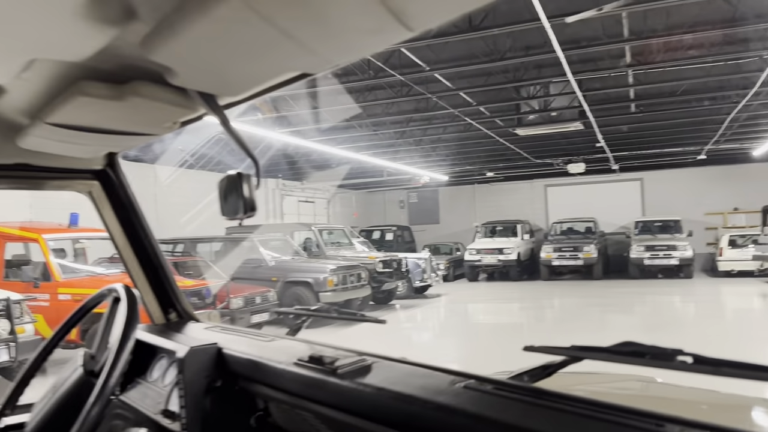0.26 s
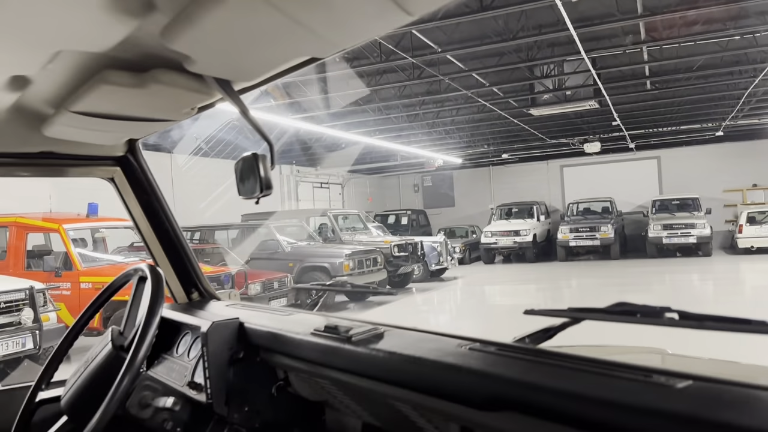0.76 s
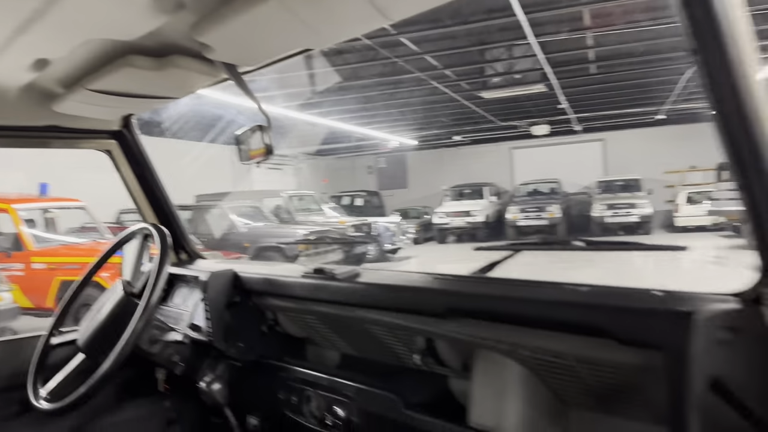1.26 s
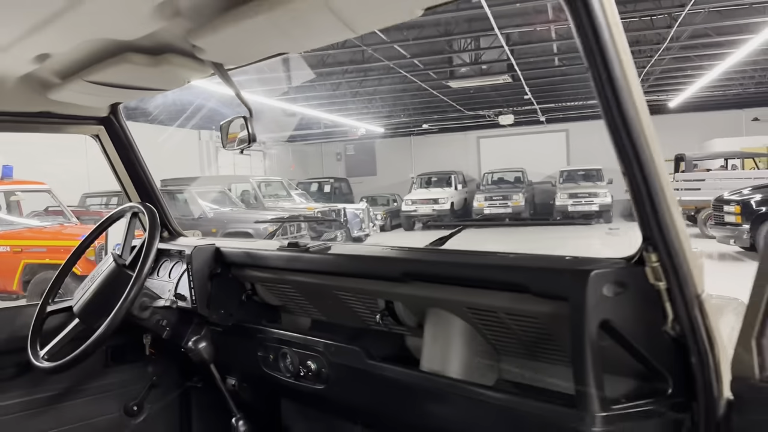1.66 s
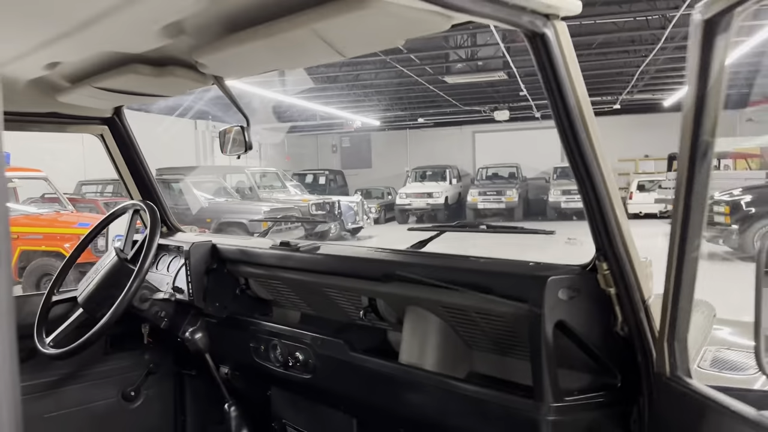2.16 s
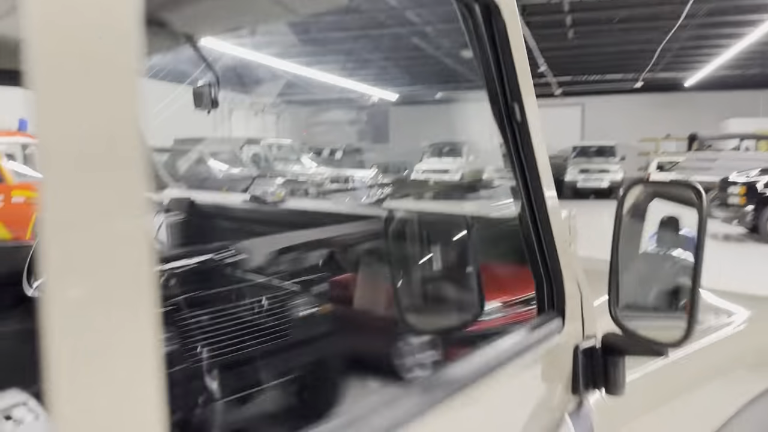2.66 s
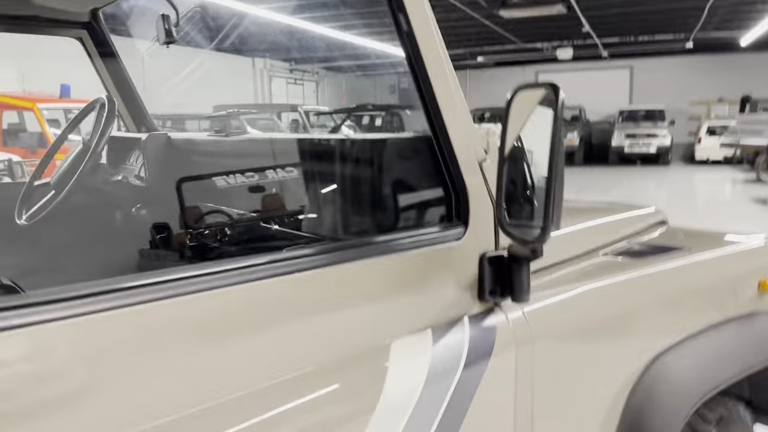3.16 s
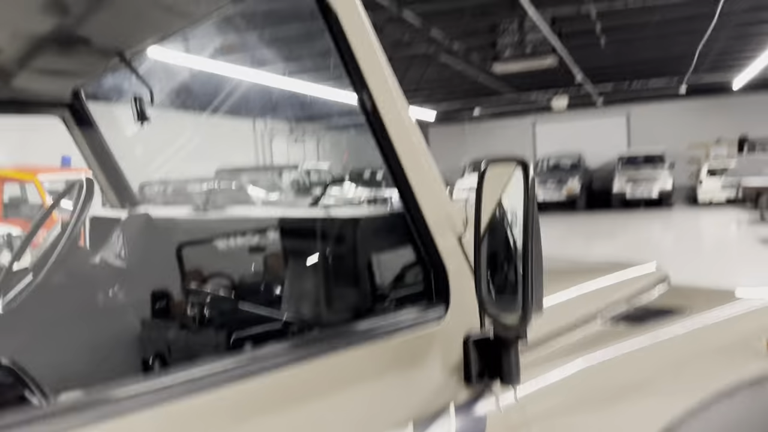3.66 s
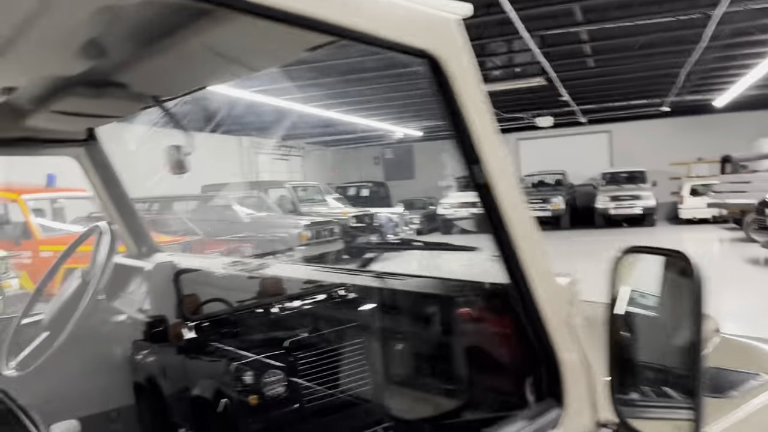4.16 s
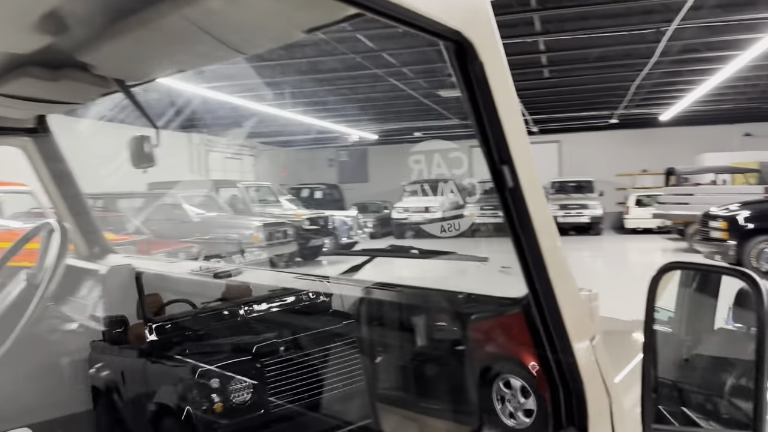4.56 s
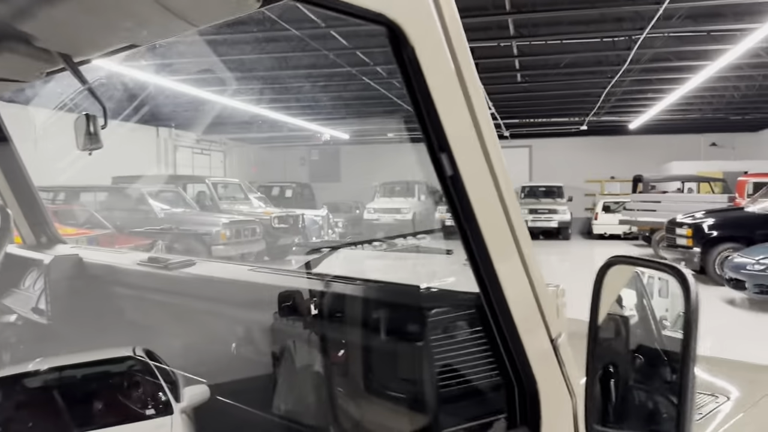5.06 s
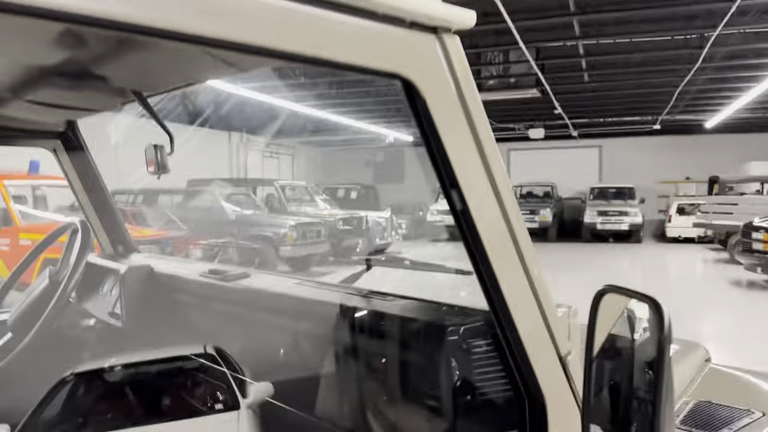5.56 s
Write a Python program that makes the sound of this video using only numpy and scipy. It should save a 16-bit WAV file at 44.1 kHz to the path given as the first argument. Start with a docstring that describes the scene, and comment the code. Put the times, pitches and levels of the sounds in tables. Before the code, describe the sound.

In a big echoing showroom, cloth and shoes rub, a floor thuds, door hardware clicks and ratchets, then a heavy steel vehicle door slams.

```python
"""In a large showroom someone climbs out of an off-road car and then slams its steel door.
Clothes and soles rub as shaped noise, the floor pan thuds as sinking modes, the door hardware clicks,
and the stay chatters by stick-slip. In the slam the latch catches, the panels ring, the cabin booms
and loose parts rattle, as short noise bursts and damped modes. The hall answers with decaying noise
tails, over a low ventilation rumble, a mains hum and a hiss of air."""
import sys
import numpy as np
from scipy import signal
from scipy.fft import rfft, irfft, next_fast_len
from scipy.io import wavfile
from scipy.ndimage import map_coordinates

SR = 44100
rng = np.random.default_rng(int(sys.argv[2]) if len(sys.argv) > 2 else 0)


def inscribe(sig):
    """Save sig as 16-bit PCM at rate SR to the path in sys.argv[1].

    A 1-D sig is mono; a 2-D sig holds one channel per row.
    Samples are clipped to [-1, 1] before scaling.
    """
    pcm = np.round(np.clip(np.atleast_2d(sig).T, -1, 1) * 32767)
    wavfile.write(sys.argv[1], SR, pcm.astype(np.int16))


N = 255780  # samples

# Edges of the five registers thump, body, clank, crack, sizzle: edge_hz
REGISTER_EDGES = [130, 330, 900, 2300, 7000, 16000]
# Register balance of each kind of contact: thump_db, body_db, clank_db, crack_db, sizzle_db
SLAM_TONE = [-6, 4, 3, 2, -8]
TAP_TONE = [-3.5, -1, 4, 3.5, -2.5]
SLIP_TONE = [-10, -10.5, -2.5, -18.5, -31]
SCUFF_TONE = [-1, 2, 0.5, -13, -27]
SWISH_TONE = [-1.5, -12, -8, -2.5, -5]

# Contacts of the closing door; t60_s is that of the clank register and of the struck part:
# start_s, level_db, tilt_db (per register), t60_s, part_pitch_hz, part_level_db
SLAM_CONTACTS = [(4.799, -31, -0.5, 0.073, 2900, -29), (4.806, -28.5, -9.5, .05, 2000, -27.5),
                 (4.8155, -15, 4.5, 0.025, 5020, -17.5), (4.8195, -21.5, 4.5, 0.019, 4050, -30.5),
                 (4.8226, -31, -11.5, 0.022, 780, -27.5), (4.83, -28, 2, 0.11, 6200, -27.5),
                 (4.851, -18.5, 1.5, 0.035, 6500, -20.5), (4.8573, -13, -1, 0.022, 1300, -15),
                 (4.8585, -28, 0, 0.025, 5600, -24.5), (4.877, -34, 3, .06, 10200, -41),
                 (4.883, -37.5, 5.5, .04, 10480, -45.5), (4.899, -34.5, -5.5, .05, 420, -28.5),
                 (4.914, -36, 0.5, .06, 3670, -34.5), (4.934, -44, -9, .05, 1500, -40),
                 (4.969, -29.5, -2.5, 0.034, 7040, -37.5), (4.9725, -34.5, -3.5, 0.037, 3640, -35),
                 (5.2186, -43, 1, .06, 1233, -38.5), (5.229, -49, -4, .05, 2700, -47)]
# Build-up of a door contact in each register, the bass slowest: rise_s
SLAM_RISE = [.016, 0.0029, 0.0012, .0005, .0004]
# Resonances of the door shell: centre_hz, width_hz, level_db
DOOR_SHELL = [(226, 120, 7), (360, 75, -8.5), (479, 140, -12.5), (806, 430, -12), (1240, 290, -14),
              (1300, 200, -7.5), (1633, 210, -5.5), (2010, 380, -10), (2770, 530, -9), (3980, 1500, -14),
              (5250, 390, -12.5), (6760, 3100, -22.5), (9900, 2700, -18.5), (13800, 4000, -28)]
# Cabin air, shoved by the seal: pitch_hz, relative_db, t60_s
CABIN_MODES = [(47, -9.5, 0.33), (57.4, -7.5, 0.37), (77.6, -6.5, 0.32), (130.7, -13.5, 0.22)]
# Broad door skin: pitch_hz, relative_db, t60_s
SKIN_MODES = [(198, -26, 0.39), (229.2, -8.5, 0.13), (256.8, -12.5, 0.38), (316, -19.5, 0.079),
              (370, -21, 0.17), (385.4, -20, .18), (431, -24, 0.09), (464, -27, 0.22), (626, -33, 0.17)]
# Stiff door frame and its glass: pitch_hz, relative_db, t60_s
FRAME_MODES = [(722, -34, .3), (777, -32, .25), (804, -29, .2), (915, -34, .2), (948, -29, .22),
               (1140, -29, .18), (1222, -30, .2), (1315, -30, .19), (1600, -35, .2), (1660, -31, .2),
               (1820, -40, .18), (2090, -33, .11), (2175, -42, .14), (2660, -39, .11)]
# Steel latch: pitch_hz, relative_db, t60_s
LATCH_MODES = [(2770, -23, .022), (3370, -35, .07), (4050, -21, .028), (5450, -27, 0.04), (5610, -34, 0.07),
               (6090, -29, .06)]
# Low standing waves that hang on after the slam: pitch_hz, level_db, t60_s
STANDING_WAVES = [(43.1, -21, 2.17), (45, -25.5, 1.5), (75.5, -23, 1.5), (83.5, -26, 2.4),
                  (121.7, -23.5, 0.97), (171.8, -24, 1.2)]
# Left-right likeness of door sounds: freq_hz, correlation (0-1)
DOOR_LIKENESS = [(100, 0.7), (400, 0.7), (1000, 0.3), (4000, 0.2), (10000, .95)]
# Phase lead of the left side in the slam: freq_hz, lead_rad
DOOR_PHASE_LEAD = [(100, 0.36), (500, -0.9), (1300, 1.5), (2900, -1.6), (5600, 1.5), (8100, 1.5),
                   (11000, 0.6), (15000, 1)]
# Lean of the slam to the left: freq_hz, left_over_right_db
DOOR_LEAN = [(60, 1.5), (110, 2), (200, 4), (380, 5.5), (700, 3.5), (1300, -1), (2400, 0.5), (4400, 2.5),
             (8100, 1.5), (15000, 0)]

# Clicks of the handle and lock:
# start_s, level_db, tilt_db (per register), rise_s, t60_s, part_pitch_hz, part_level_db
CLICKS = [(0.8738, -43.5, -0.5, 0.001, .11, 870, -39), (1.261, -65, -4, 0.0018, .04, 950, -56),
          (1.278, -65, -6, 0.0017, 0.039, 3000, -55), (1.307, -83, 1, .002, .04, 1640, -51.5),
          (1.324, -58, -4.5, .0017, 0.034, 850, -55), (1.347, -62, -3, .0016, 0.026, 3700, -52.5),
          (1.383, -74, -1, .002, .04, 1500, -54), (1.473, -62, -5, 0.0018, .09, 457, -50),
          (1.493, -57.5, -0.5, 0.0033, 0.24, 4540, -56.5), (1.511, -56.5, -1, 0.0022, 0.069, 696, -44),
          (1.517, -58, -0.5, .001, .05, 5700, -49), (1.742, -44, 2.5, 0.0124, .18, 4530, -49),
          (1.759, -64.5, 10.5, .001, .04, 2360, -39), (1.77, -52, 5, 0.0012, 0.034, 1490, -46),
          (2.0921, -37, 2.5, 0.0047, .15, 305, -35.5), (2.325, -60.5, -6, 0.0042, 0.086, 1300, -62),
          (5.18, -50.5, -7.5, 0.00094, .02, 3400, -48)]
# Resonances of the small hardware: centre_hz, width_hz, level_db
HARDWARE_BODY = [(260, 250, 3), (478, 800, 4.5), (840, 900, -6), (1110, 120, 4.5), (1320, 700, 6.5),
                 (2100, 410, -11.5), (2730, 860, -13), (3630, 640, -14.5), (4350, 1000, -11),
                 (5860, 2000, -20.5), (7160, 700, -22), (9680, 2300, -19), (13400, 4000, -27.5)]
# Spring catch: pitch_hz, level_db, t60_s
CATCH_MODES = [(490, -31, .095), (810, -31, .06), (980, -45, .16), (1770, -43, .09), (2035, -43, .065),
               (2676, -45, .11), (3214, -41, .075), (3790, -41, .08), (3935, -46, .1), (4258, -49, .12),
               (4500, -41, .07)]
# Door handle: pitch_hz, level_db, t60_s
HANDLE_MODES = [(1287, -29, .11), (2050, -40, .08), (2503, -36, .1), (3661, -38, .12), (4630, -36, .075),
                (4872, -47, .1), (5410, -47, .12), (6105, -43, .1), (7138, -47, .09), (7488, -48, .11)]
# Lock mechanism: pitch_hz, level_db, t60_s
LOCK_MODES = [(275, -34, .15), (354, -35, .17), (856, -31, .1), (1150, -38, .12), (1254, -40, .21),
              (1964, -39, .1), (2890, -38, .12), (3273, -41, .14), (4370, -37, .09), (4791, -41, .14),
              (5405, -47, .13), (7400, -43, .1), (7585, -42, .11)]
# Slips of the stay as the door swings: start_s, level_db
STAY_SLIPS = [(1.7978, -32.5), (1.82, -34.5), (1.845, -35), (1.8902, -36), (1.901, -43.5), (2.0472, -34.5),
              (2.067, -36.5), (2.079, -38.5), (4.351, -46.5), (4.376, -58), (4.3975, -47.5), (4.424, -47.5)]
# Steel stay of the door: pitch_hz, relative_db, t60_s
STAY_MODES = [(863, -17, .1), (1063, -8.5, .1), (1150, -13, .08), (1295, -6, .08), (1343, -7.5, .1),
              (1456, -11, .07), (1487, -9, .07), (1965, -12, .07), (2350, -18, .05)]
# Lean of the small hardware to the left: freq_hz, left_over_right_db
HARDWARE_LEAN = [(200, 4.0), (400, -1.5), (2400, 0.5), (4400, 3.5), (15000, 0.0)]
# Knocks on sheet metal: start_s, peak_db, softness_hz (low-pass), lowest_hz (high-pass)
KNOCKS = [(1.015, -47, 800, 200), (3.685, -38, 650, 150), (3.7014, -22.5, 633, 90),
          (3.7104, -41, 5000, 600), (4.351, -38, 900, 200), (4.426, -39.5, 703, 150),
          (4.646, -42.5, 753, 150), (4.723, -34.5, 700, 199), (4.8202, -11.5, 239.6, 60),
          (4.8255, -12.5, 190.6, 60), (4.858, -16, 1100, 200)]
# Loose trim panel: pitch_hz, relative_db, t60_s
TRIM_MODES = [(58, -26, .12), (135, -27.5, 0.029), (320, -36, .025), (460, -41, .03), (1180, -31.5, 0.013),
              (2170, -40, 0.012)]
# Creaks of the pushed hinge: start_s, level_db
HINGE_CREAKS = [(4.647, -52.5), (4.656, -46.5), (4.6635, -47), (4.669, -45.5), (4.6745, -47), (4.7335, -54),
                (4.787, -59)]
# Resonances of the creaking hinge: centre_hz, width_hz, level_db
HINGE_BODY = [(6400, 880, -2.5), (10100, 1800, -4.5), (14000, 3000, -15)]
# Faint singing of the hinge as the door swings out: start_s, end_s, pitch_hz, level_db
HINGE_SQUEALS = [(1.29, 1.54, 2120, -73), (1.53, 1.67, 3000, -75)]

# Soles sliding: start_s, end_s, level_db, tilt_db (per register)
SOLE_SCUFFS = [(.211, .355, -47.5, 0.5), (.427, .452, -56.5, -7), (.455, .51, -69.5, -8.5),
               (.62, .66, -64, -9.5), (.772, .83, -56.5, 3), (1.258, 1.403, -67, 7.5),
               (1.465, 1.52, -67, -9.5), (3.379, 3.422, -54.5, 4.5), (4.355, 4.44, -61, -2),
               (4.656, 4.684, -47, -3), (4.684, 4.705, -55.5, -8), (3.53, 3.562, -70.5, -10.5),
               (4.70, 4.775, -61.5, -8.5), (4.777, 4.804, -49, -6.5)]
# Clothes brushing: start_s, end_s, level_db, tilt_db (per register)
CLOTH_SWISHES = [(0, .63, -60.5, -1.5), (.46, .615, -55, -3.5), (4.30, 4.435, -83.5, 9),
                 (4.395, 4.425, -67, 5.5), (4.66, 4.76, -76, 5), (5.17, 5.212, -69, 7.5),
                 (5.223, 5.29, -71, 0.5)]
# Resonances of the rubbed cab: centre_hz, width_hz, level_db
RUBBED_CAB = [(246, 48, 0), (493, 170, 10), (627, 170, 9), (1038, 310, -2.5), (1240, 170, -3.5),
              (1880, 800, -31.5), (2940, 4700, -17.5), (5650, 12000, -25.5), (9900, 2200, -16.5),
              (14000, 4000, -21)]
# Floor pan: pitch_hz (before it sinks), level_db, t60_s
FLOOR_MODES = [(110, -21, 0.46), (169.6, -24, 0.46), (197.6, -14.5, 0.17), (243, -21, 0.19),
               (303, -17.5, 0.097), (356.5, -29.5, 0.2)]
# Left-right likeness of nearby small sounds: freq_hz, correlation (0-1)
NEAR_LIKENESS = [(200, 0.87), (1000, 0.12), (4000, 0.21), (12000, 0.67)]

# Decay of the hall: freq_hz, t60_s
HALL_DECAY = [(50, 1.7), (120, 0.87), (300, 0.52), (1000, 0.93), (4000, 0.91), (12000, 0.19)]
# Relative strength of the hall: freq_hz, level_db
HALL_STRENGTH = [(45, -18.5), (100, -2.5), (250, -14.5), (520, -16.5), (1500, -22.5), (5000, -26.5),
                 (12000, -21)]
# Left-right likeness of hall and ventilation: freq_hz, correlation (0-1)
HALL_LIKENESS = [(60, 1), (150, 0.92), (380, 0.6), (950, 0.077), (2380, 0.053), (5980, 0.045),
                 (15000, 0.22)]
# Spectrum of the duct rumble: freq_hz, relative_db
RUMBLE_SPECTRUM = [(13, -63.5), (22, -37), (39, -12), (59, 0), (81, -5), (119, -2.5), (167, -5.5),
                   (241, -22.5), (316, -26.5), (380, -28), (416, -29), (500, -33.5), (650, -77.5),
                   (1100, -120)]
# Mean level of the duct rumble: time_s, level_db
RUMBLE_COURSE = [(0, -43.5), (.55, -42.5), (.75, -41), (5.8, -38.5)]
# Spectrum of the moving air: freq_hz, relative_db
AIR_SPECTRUM = [(240, -30), (400, -4), (442, -4.5), (477, -5), (613, -1.5), (1240, -5), (1510, -8),
                (2590, -18.5), (7150, -25), (8000, -31.5), (10400, -76.5), (17600, -120)]
# Lean of the rumble and hum, and of the air, to the left: freq_hz, left_over_right_db
RUMBLE_LEAN = [(60, 2.2), (200, 1.2), (380, 1.9)]
AIR_LEAN = [(400, 1.5), (700, 1.5), (2400, 0.85), (4400, 15.5), (8000, 24.9)]

SHIVER_DB, SHIVER_T60_S = -30, .19  # weak after-shake of the door shell
PART_WIDTH = 0.36  # bandwidth of a struck part's ring, as a share of its pitch
SPRING_HZ, SPRING_WIDTH_HZ, SPRING_DB, SPRING_T60_S = 3800, 2300, -38.5, 0.18
SLIP_RISE_S, SLIP_T60_S = .0008, .055
CHATTER_S, CHATTER_DB = .003, -8.5  # nominal delay and relative level of the stumble after a slip
TOP_HZ = 16100


def slam(low_life=1.5, crack_life=0.55, sizzle_life=0.63):
    """Repeated impact: latch and frame meet, the seal shoves the cabin air, hard stops excite modes."""
    out = np.zeros((2, N))
    t = np.arange(SR // 4) / SR
    lives = np.array([low_life, low_life, 1, crack_life, sizzle_life])[:, None, None]
    rise_s = np.array(SLAM_RISE)[:, None, None]
    for start_s, level_db, tilt_db, t60_s, part_hz, part_db in SLAM_CONTACTS:
        # a sharp crack, then the shell of the door shivers on
        crack = amp(-60 * t / (t60_s * lives))
        shiver = amp(SHIVER_DB - 60 * t / SHIVER_T60_S)
        fade = (crack + shiver) * (1 - np.exp(-t / rise_s))
        levels_db = voiced(SLAM_TONE, level_db, tilt_db)
        shell = dense(DOOR_SHELL, DOOR_LIKENESS, levels_db, len(t))
        add(out, start_s, np.sum(fade * shell, axis=0))
        add(out, start_s, clink(part_hz, part_db, t60_s))
    add(out, 4.8305, amp(-0.5) * ring(CABIN_MODES, cycles=0.43))
    # the two hard stops
    add(out, 4.819, ring(SKIN_MODES, cycles=0.94))
    add(out, 4.856, amp(-1.5) * ring(SKIN_MODES, cycles=0.22))
    add(out, 4.8175, amp(-1.0) * ring(FRAME_MODES, cycles=1.9))
    add(out, 4.858, amp(-0.5) * ring(FRAME_MODES, cycles=0.72))
    add(out, 4.816, ring(LATCH_MODES, cycles=2.6))
    add(out, 4.857, amp(-5.5) * ring(LATCH_MODES, cycles=3))
    halves = np.array([[1], [-1]])  # left leads by half, right lags by half
    out = filtered(out, lambda hz: np.exp(.5j * along(DOOR_PHASE_LEAD, hz) * halves))
    return leaning(out, DOOR_LEAN)


def boom():
    """Standing waves: deep modes swell after the slam and beat slowly as they die."""
    out = np.zeros((2, N))
    add(out, 4.84, ring(STANDING_WAVES, cycles=1.6))
    return panned(out, left_db=3.5)


def clink(hz, level_db, t60_s, rise_s=.0005):
    """Modal clustering: a struck part rings as a narrow band of close modes."""
    t = np.arange(SR // 4) / SR
    colour = lambda f: peak(f, hz, PART_WIDTH * hz)
    cluster = noise(colour, DOOR_LIKENESS, len(t))
    return amp(level_db - 60 * t / t60_s) * (1 - np.exp(-t / rise_s)) * cluster


def taps():
    """Impact and stick-slip: catch, handle and lock click and ring; the stay chatters in short slips."""
    out = np.zeros((2, N))
    for start_s, level_db, tilt_db, rise_s, t60_s, part_hz, part_db in CLICKS:
        add(out, start_s, clink(part_hz, part_db, t60_s))
        add(out, start_s, click(voiced(TAP_TONE, level_db, tilt_db), rise_s, t60_s))
    add(out, .8752, ring(CATCH_MODES, cycles=.8))
    add(out, .8752, spring())
    add(out, 1.752, ring(HANDLE_MODES, cycles=3.7, sag_s=0.0044, strain=0.1))
    add(out, 2.0955, ring(LOCK_MODES, cycles=2.6))
    for start_s, level_db in STAY_SLIPS:
        slip_db = np.add(SLIP_TONE, level_db)
        stumble_s = start_s + CHATTER_S * rng.uniform(.5, 2)
        add(out, start_s, click(slip_db, SLIP_RISE_S, SLIP_T60_S))
        add(out, stumble_s, click(slip_db + CHATTER_DB, SLIP_RISE_S, SLIP_T60_S))
        # the pitch drifts slightly, up or down
        add(out, start_s, amp(level_db) * ring(STAY_MODES, cycles=2.5, sag=rng.normal(0, .012)))
    return leaning(out, HARDWARE_LEAN)


def click(levels_db, rise_s, t60_s, snap=0.45, snap_s=0.00069):
    """Impulsive excitation: a small steel contact snaps, swells and dies."""
    t = np.arange(SR // 4) / SR
    swell = np.minimum(t / rise_s, 1)
    decay = amp(-60 * np.maximum(t - rise_s, 0) / t60_s)
    fade = swell * decay * (1 + snap * np.exp(-t / snap_s))
    return fade * dense(HARDWARE_BODY, NEAR_LIKENESS, levels_db, len(t)).sum(axis=0)


def spring():
    """High modal density: the spring behind the catch buzzes on in a band of close modes."""
    t = np.arange(SR // 4) / SR
    buzz = noise(lambda hz: peak(hz, SPRING_HZ, SPRING_WIDTH_HZ), NEAR_LIKENESS, len(t))
    return amp(SPRING_DB - 60 * t / SPRING_T60_S) * buzz


def knocks(travel_s=0.001997, slope=2.95):
    """Dispersion: bending waves run faster the higher they are, so a knock is a quick falling chirp."""
    out = np.zeros((2, N))
    hz = np.fft.rfftfreq(SR // 8, 1 / SR)
    cycles = 2 * travel_s * np.sqrt(1000 * hz)  # the delay is travel_s at 1 kHz
    for start_s, peak_db, soft_hz, low_hz in KNOCKS:
        colour = hz ** 2 / (hz ** 2 + low_hz ** 2) / (1 + (hz / soft_hz) ** slope)
        wave = irfft(colour * np.exp(-2j * np.pi * cycles))
        add(out, start_s, amp(peak_db) * wave / np.abs(wave).max())
    return panned(out, left_db=8.5)


def trim(left_db=8):
    """Modal response: a soft bump and a harder second one shake the loose trim panel."""
    out = np.zeros((2, N))
    add(out, 3.7025, amp(-8.5) * ring(TRIM_MODES, cycles=.6))
    add(out, 3.711, ring(TRIM_MODES, cycles=.4))
    return panned(out, left_db)


def hinge(tick_t60_s=.013, squeal_width_hz=110):
    """Dry friction: the hinge ticks under a push and sings hoarsely in a steady swing."""
    out = np.zeros((2, N))
    t = np.arange(SR // 16) / SR
    colour = lambda hz: sum(amp(db) * peak(hz, centre, width) for centre, width, db in HINGE_BODY)
    for start_s, level_db in HINGE_CREAKS:
        tick = noise(colour, NEAR_LIKENESS, len(t))
        add(out, start_s, amp(level_db - 60 * t / tick_t60_s) * tick)
    for start_s, end_s, pitch_hz, level_db in HINGE_SQUEALS:
        size = round((end_s - start_s) * SR)
        song = noise(lambda hz: peak(hz, pitch_hz, squeal_width_hz), NEAR_LIKENESS, size)
        add(out, start_s, amp(level_db) * signal.windows.tukey(size) * song)
    return out


def climbing_out(attack_s=0.0059, release_s=0.0081, grain_db=2, grain_rate_hz=220):
    """Sliding friction in grainy strokes, and a foot that loads the floor pan with a sinking thud."""
    out = np.zeros((2, N))
    t = np.arange(3 * SR // 4) / SR
    for strokes, tone_db in (SOLE_SCUFFS, SCUFF_TONE), (CLOTH_SWISHES, SWISH_TONE):
        for start_s, end_s, level_db, tilt_db in strokes:
            after_s = np.maximum(t - (end_s - start_s), 0)
            stroke = (1 - np.exp(-t / attack_s)) * np.exp(-after_s / release_s)
            grain = unit(amp(grain_db * wobble(grain_rate_hz, len(t))))
            levels_db = voiced(tone_db, level_db, tilt_db)
            rub = dense(RUBBED_CAB, NEAR_LIKENESS, levels_db, len(t)).sum(axis=0)
            add(out, start_s, stroke * grain * rub)
    thud = ring(FLOOR_MODES, cycles=3.2, sag=0.459, sag_s=0.0513)
    add(out, .627, panned(thud, left_db=3.5))
    return out


def showroom(x, split_hz=800):
    """Scattering: roof trusses and parked cars break up the treble far more finely than the bass."""
    bass = filtered(x, lambda hz: 1 / (1 + (hz / split_hz) ** 8))
    bass_answer = diffuse(bass, handover_s=.025, count=3)
    treble_answer = diffuse(x - bass, handover_s=.0016, count=5)
    return amp(4.5) * bass_answer + amp(5.5) * treble_answer


def diffuse(x, handover_s, count):
    """Diffusion: successive instants of a sound take different paths through the hall."""
    turn = np.arange(N) / SR / handover_s
    share = lambda k: np.maximum(1 - np.abs((turn - k) % count - 1), 0)  # crossfaded triangles
    return sum(hall(x * share(k)) for k in range(count))


def hall(x, build_s=0.088):
    """Reverberation: the answer builds up as the walls are reached; the deepest bass lingers longest."""
    hz, t, z = signal.stft(noise(np.ones_like, HALL_LIKENESS, 3 * SR // 2), SR, nperseg=512)
    decay = amp(-60 * t / along(HALL_DECAY, hz)[:, None]) * (1 - np.exp(-t / build_s))
    decay /= np.sqrt(np.mean(decay ** 2, axis=1, keepdims=True))
    decay *= amp(along(HALL_STRENGTH, hz))[:, None]
    tail = signal.istft(z * decay, SR, nperseg=512)[1]
    tail /= np.sqrt(tail.shape[1])
    mono = x.mean(axis=0)[None]
    return panned(signal.fftconvolve(mono, tail, axes=1)[:, :N], left_db=1.0)


def ventilation():
    """Stationary noise and tone: duct rumble, mains hum, moving air and a faint white hiss."""
    t = np.arange(N) / SR
    rumble_db = np.interp(t, *np.transpose(RUMBLE_COURSE)) + 1.4 * wobble(8.4, N)
    rumble = amp(rumble_db) * noise(lambda hz: amp(along(RUMBLE_SPECTRUM, hz)), HALL_LIKENESS, N)
    hum = amp(-48.5 + 0.64 * wobble(1.3, N)) * np.sin(2 * np.pi * 60.3 * t)
    air = amp(-61.0) * noise(lambda hz: amp(along(AIR_SPECTRUM, hz)), HALL_LIKENESS, N)
    hiss = amp(-79) * rng.standard_normal((2, N))
    return leaning(rumble + hum, RUMBLE_LEAN) + leaning(air, AIR_LEAN) + hiss


def ring(modes, cycles, sag=0, sag_s=0.055, strain=0):
    """Modal superposition: damped sines build up over some cycles and glide from 1 + strain to 1 - sag."""
    t = np.arange(SR) / SR
    settling = sag_s * (1 - np.exp(-t / sag_s))
    bent = t - sag * (t - settling) + strain * settling
    out = np.zeros(SR)
    for hz, level_db, t60_s in modes:
        decay = amp(level_db + rng.normal() - 60 * t / t60_s)  # each strike varies by about 1 dB
        out += decay * np.sin(2 * np.pi * hz * bent) * (1 - np.exp(-t * hz / cycles))
    return out


def dense(resonances, alike, levels_db, size):
    """Statistical modes: countless close modes act as noise in resonances, split into registers."""
    power = lambda hz, centre, width, db: (amp(db) / (1 + (2 * (hz - centre) / width) ** 2)) ** 2
    colour = lambda hz: np.sqrt(sum(power(hz, *resonance) for resonance in resonances))
    x = noise(colour, alike, size)
    band = lambda lo, hi: lambda hz: 1 / np.sqrt((1 + (lo / (hz + 1)) ** 16) * (1 + (hz / hi) ** 16))
    registers = zip(levels_db, REGISTER_EDGES, REGISTER_EDGES[1:])
    return np.array([amp(db) * unit(filtered(x, band(lo, hi))) for db, lo, hi in registers])


def voiced(tone_db, level_db, tilt_db):
    """Spectral tilt: register levels of one contact, tilted about the middle register."""
    return np.array(tone_db) + level_db + tilt_db * (np.arange(len(tone_db)) - 2)


def peak(hz, centre, width):
    """Resonance: a squared bell of gain about a centre frequency."""
    return 1 / (1 + (2 * (hz - centre) / width) ** 2) ** 2


def noise(colour, alike, size):
    """Partial coherence: coloured stereo noise of rms 1, its mid and side set by the likeness."""
    turn = lambda hz: np.arccos(np.clip(along(alike, hz), 0, 1)) / 2
    mid_side = lambda hz: colour(hz) * [np.cos(turn(hz)), np.sin(turn(hz))]
    mid, side = filtered(rng.standard_normal((2, size)), mid_side)
    return unit(np.array([mid + side, mid - side]))


def wobble(rate_hz, size):
    """Slow fluctuation: a smooth random curve with rate_hz knots a second."""
    knots = rng.standard_normal(size // 16)
    return map_coordinates(knots, [np.arange(size) * rate_hz / SR], mode="wrap")


def leaning(x, left):
    """Interaural level difference: lean each frequency to the left by its own amount."""
    return filtered(x, lambda hz: amp(along(left, hz) * np.array([[.5], [-.5]])))


def panned(x, left_db):
    """Interaural level difference: lean a whole sound to the left."""
    return x * amp([[left_db / 2], [-left_db / 2]])


def filtered(x, response):
    """Linear filtering: multiply the spectrum by a response of frequency."""
    n = x.shape[-1]
    m = next_fast_len(n + SR // 8)
    return irfft(rfft(x, m) * response(np.fft.rfftfreq(m, 1 / SR)), m)[..., :n]


def along(points, hz):
    """Logarithmic pitch scale: interpolate (freq_hz, value) points on a log axis."""
    f, v = np.transpose(points)
    return np.interp(np.log(hz + 1), np.log(f + 1), v)


def add(track, start_s, sound):
    """Superposition: mix a sound into the track from start_s."""
    part = track[:, max(round(start_s * SR), 0):][:, :sound.shape[-1]]
    part += sound[..., :part.shape[1]]


def amp(db):
    """Level law: decibels to gain."""
    return 10 ** (np.asarray(db) / 20)


def unit(x):
    """Effective value: scale to rms 1."""
    return x / np.sqrt(np.mean(x ** 2) + 1e-20)


def scene():
    """Direct and reverberant field: the car close by, the hall around it."""
    door = slam()
    small = taps() + knocks() + trim() + hinge() + climbing_out()
    answer = showroom(door + amp(-5.0) * small)
    return door + boom() + small + answer + ventilation()


def record(dry):
    """Saturation and band limiting: peaks round off at full scale, nothing passes TOP_HZ."""
    rounded = dry / (1 + np.abs(dry) ** 8) ** (1 / 8)
    return filtered(rounded, lambda hz: hz < TOP_HZ)


dry = scene()
out = record(dry)
inscribe(out)
```